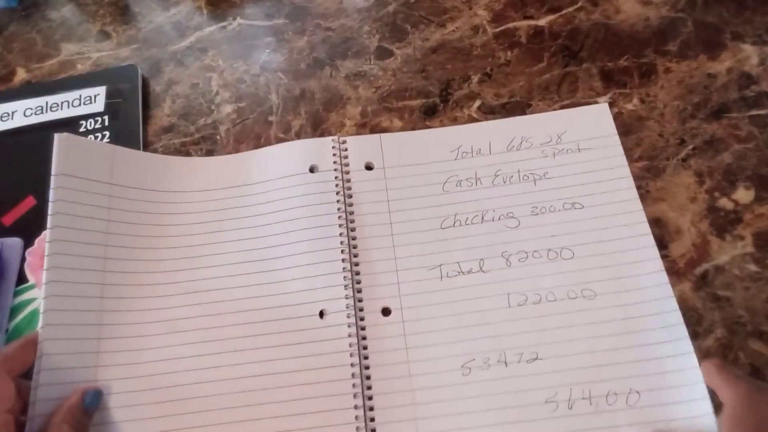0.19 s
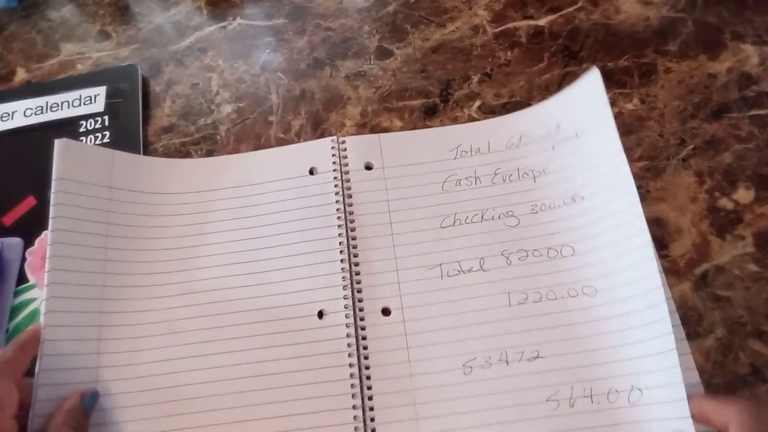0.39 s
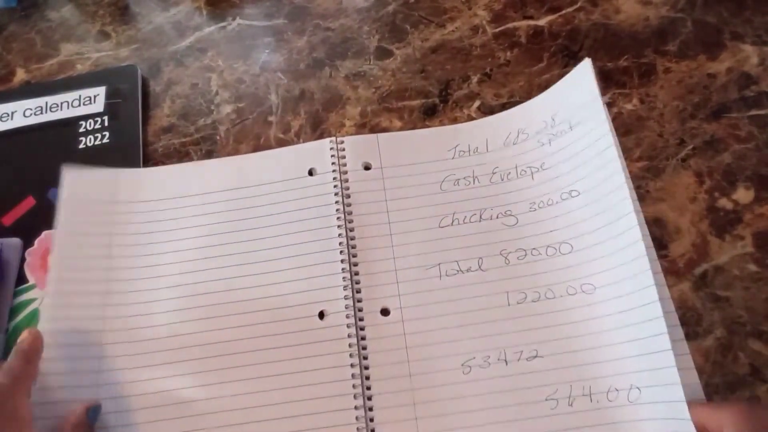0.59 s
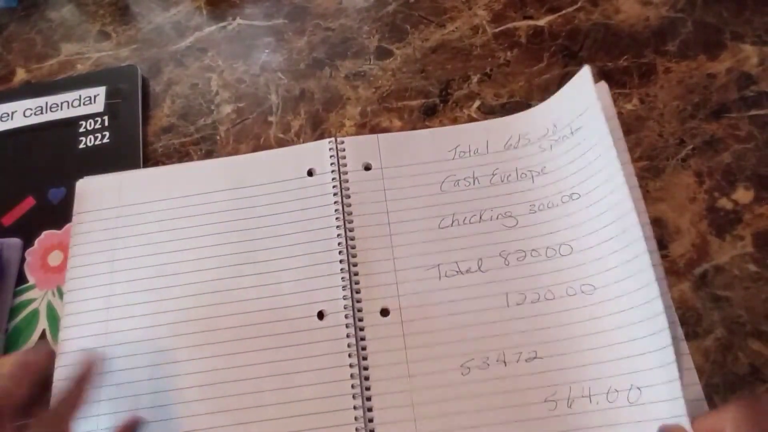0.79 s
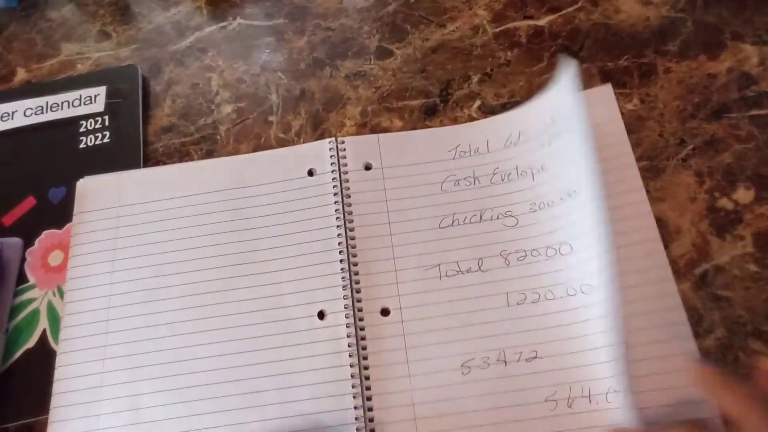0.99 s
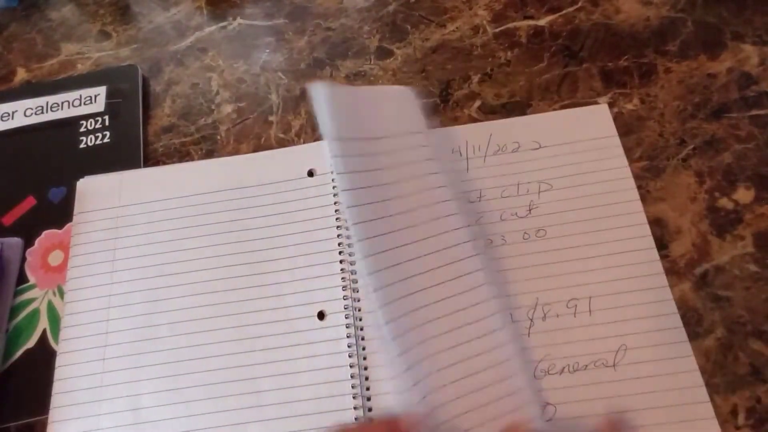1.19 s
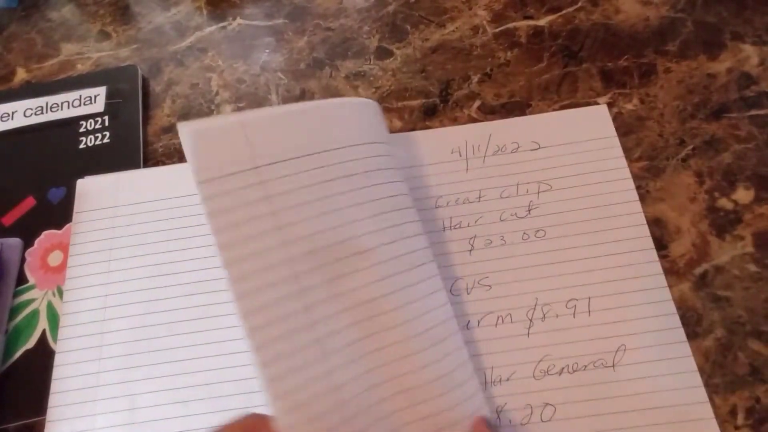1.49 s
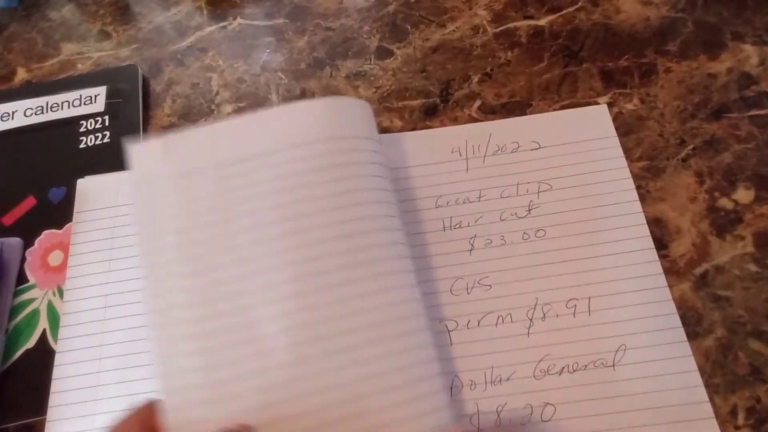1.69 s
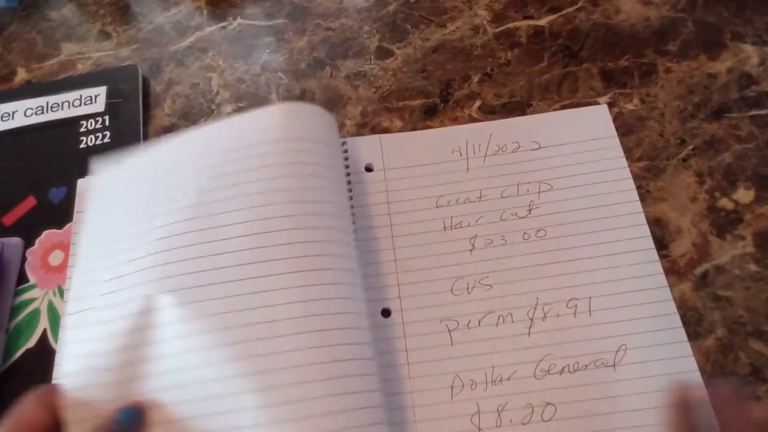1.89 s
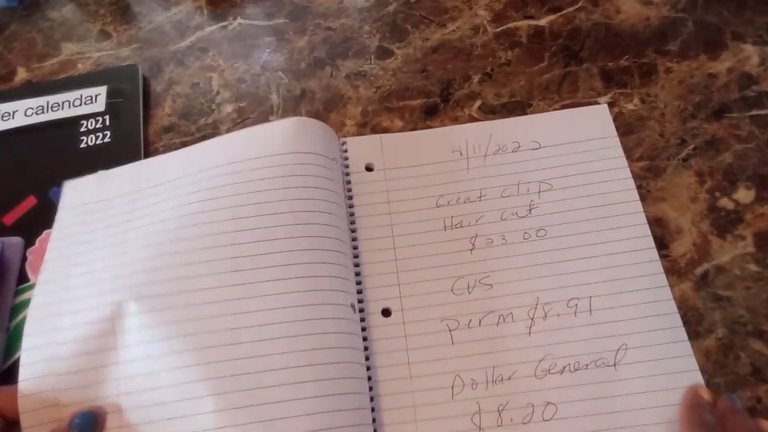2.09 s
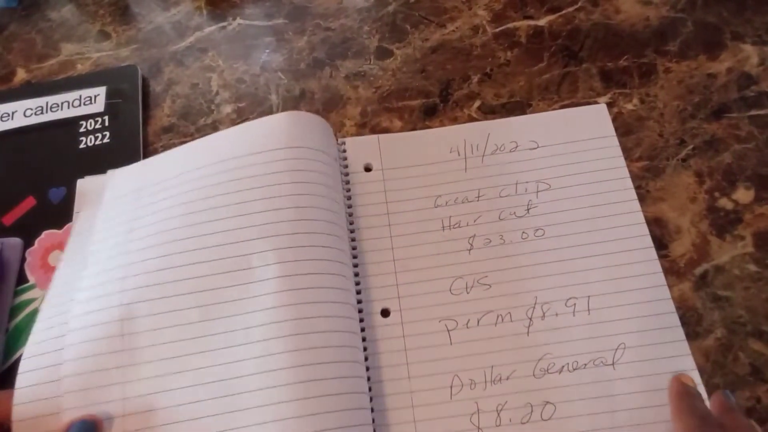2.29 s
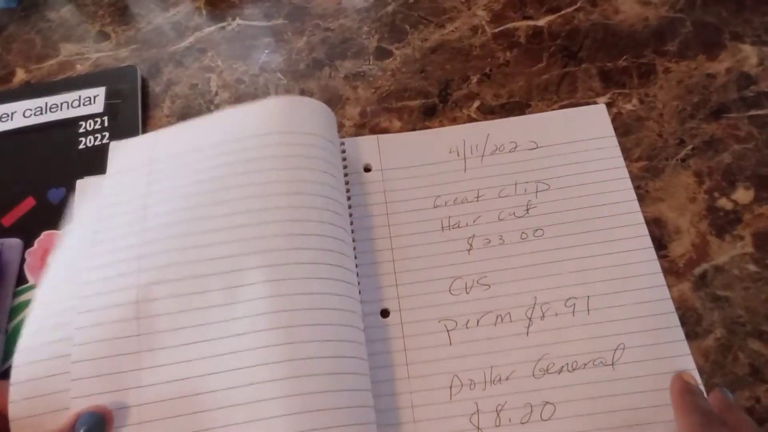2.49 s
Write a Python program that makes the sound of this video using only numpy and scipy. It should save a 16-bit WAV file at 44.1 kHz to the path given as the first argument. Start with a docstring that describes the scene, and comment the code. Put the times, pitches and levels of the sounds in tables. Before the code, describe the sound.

A spiral notebook page turning, close and mono: soft sliding rustles first, then a flurry of crisp crackles and snaps as the sheet flips, then lighter smoothing rubs, in a small room with faint low hum.

```python
"""A page of a spiral notebook is lifted, turned over and smoothed down on a stone counter, in mono.
Sliding paper is coloured noise with many tiny slips; the bending sheet flutters with fewer slips.
Its edge adds a fine bright hiss, rubs softly as it comes free, and the sheet snaps where it buckles.
The small room answers the paper with quick reflections and a short tail, under a faint wavering hum.
"""
import sys
import numpy as np
from scipy import signal
from scipy.fft import rfft, irfft
from scipy.io import wavfile

SR = 44100
rng = np.random.default_rng(int(sys.argv[2]) if len(sys.argv) > 2 else 0)


def store_wav(level_fs):
    """Save 16-bit WAV to argv[1]."""
    pcm = np.round(np.clip(np.atleast_2d(level_fs), -1, 1) * 32767)
    wavfile.write(sys.argv[1], SR, pcm.T.astype(np.int16))


N = 116865
T = np.arange(N) / SR  # time [s]

# Room hum and hiss: (frequency [Hz], relative level [dB per Hz])
HUM_COLOUR = [(20, -37), (45, -33), (75, -25), (100, -5), (150, 0), (200, -4), (260, -1), (340, -8),
              (420, -23), (700, -24.5), (1300, -74), (2000, -74), (3200, -72), (6000, -37), (10000, -77.5),
              (16000, -45)]
# Tones in the hum, before the swell: (frequency [Hz], level [dB], waver width [Hz])
HUM_TONES = [(203.6, -56, 14.4), (161.3, -61, 12.6)]
# Swells and dips of the low hum: (time [s], level [dB])
HUM_SWELL = [(0, 3), (.085, -1.5), (.13, 2), (.24, 5.5), (.3, -5), (.4, 3.5), (.58, -2), (.67, 4.5),
             (.8, -1.5), (.97, -0.5), (1.05, -1.5), (1.3, -2.5), (1.45, 3), (1.6, -6), (1.78, 1.5),
             (1.95, -1), (2.15, -4.5), (2.3, -1.5), (2.41, 3), (2.56, -1), (2.65, 2.5)]
HUM_DB = -58  # before the swell
HUM_TOP_HZ = 450  # only the sound below this swells

# Sheet sliding on sheet and under the fingers, before clumping: (time [s], level [dB])
SLIDE_LEVEL = [(0, -78), (.11, -77), (.21, -63), (.243, -49.5), (.285, -64), (.365, -62.5), (.405, -47),
               (.5, -47.5), (.6, -50.5), (.72, -54), (.775, -46), (.815, -53), (.88, -48.5), (.945, -56.5),
               (1.02, -47.5), (1.08, -59), (1.146, -73), (1.162, -52), (1.19, -54.5), (1.31, -40.5),
               (1.36, -48.5), (1.4, -46), (1.46, -47.5), (1.515, -48.5), (1.565, -42), (1.598, -45),
               (1.625, -44.5), (1.67, -44), (1.71, -53.5), (1.76, -56), (1.81, -57.5), (1.875, -64.5),
               (1.897, -51), (1.915, -54), (1.95, -51.5), (2.04, -49), (2.138, -61.5), (2.165, -48.5),
               (2.24, -47.5), (2.32, -51), (2.38, -52), (2.425, -61), (2.46, -53.5), (2.55, -60.5),
               (2.6, -74.5), (2.65, -78)]
# Colour of the sliding paper: (frequency [Hz], relative level [dB per Hz])
SLIDE_COLOUR = [(40, -33), (300, -13), (500, -37), (800, -14), (1150, 3.5), (1800, 2.5), (2500, 6.5),
                (4200, 6.5), (5800, 3), (7200, -4), (8600, -10.5), (10300, -22), (12500, -13.5),
                (16000, -12)]
SLIDE_GRAINS_PER_S, SLIDE_SPREAD_DB, SLIDE_SMOOTH = 4500, 0.5, 0.64  # smooth: hiss rms beside the slips

# Lifted sheet bending and fluttering, before clumping: (time [s], level [dB])
FLEX_LEVEL = [(0, -73.5), (.21, -79), (.245, -60.5), (.29, -74), (.5, -68.5), (.6, -59), (.7, -66),
              (.82, -79), (.865, -52), (.93, -83), (.98, -66), (1.015, -40), (1.06, -67), (1.15, -78),
              (1.2, -42.5), (1.26, -43), (1.31, -50), (1.34, -37.5), (1.362, -47), (1.43, -42.5),
              (1.5, -60.5), (1.57, -44.5), (1.6, -49.5), (1.63, -42), (1.705, -52.5), (1.738, -45.5),
              (1.76, -36.5), (1.785, -48), (1.835, -52.5), (1.875, -62), (1.945, -45), (2.04, -66),
              (2.14, -61), (2.16, -57), (2.205, -42.5), (2.27, -56.5), (2.38, -57), (2.43, -60),
              (2.48, -54.5), (2.57, -65.5), (2.65, -78)]
# Colour of the bending sheet: (frequency [Hz], relative level [dB per Hz])
FLEX_COLOUR = [(30, -36), (80, -21), (160, 1.5), (330, 4), (450, -1), (700, 5.5), (1000, 3.5), (1500, 0.5),
               (2200, -1.5), (4000, -7.5), (8000, -27), (16000, -42)]
FLEX_GRAINS_PER_S, FLEX_SPREAD_DB, FLEX_SMOOTH = 700, 2.5, 0.63

# Sheet's edge skimming the page below, before clumping: (time [s], level [dB])
SKIM_LEVEL = [(0, -82), (.38, -82), (.41, -64.5), (.58, -77), (.72, -91), (.78, -61), (.93, -68),
              (1.03, -81), (1.1, -88), (1.146, -86), (1.156, -57), (1.2, -49.5), (1.3, -60), (1.38, -76),
              (1.45, -58), (1.51, -59), (1.56, -49), (1.66, -52), (1.72, -63), (1.83, -92), (2.13, -77),
              (2.16, -61), (2.3, -73), (2.42, -92), (2.65, -90)]
# Colour of the skimming edge: (frequency [Hz], relative level [dB per Hz])
SKIM_COLOUR = [(40, -32), (1000, 22), (3500, -10), (6500, 1.5), (8500, 7), (10300, 0.5), (12500, 10),
               (16000, -10.5)]

CLUMP_HZ, CLUMP_DB = 50, 1.48  # slips come in clumps: bandwidth, rms depth
PATCH_DB, PATCH_HZ, PATCH_S = 2, 262.7, 0.047  # shifting resonances: rms depth, width, lifetime

# Page edge rubbing free:
# (time of its height [s], level [dB], centre [Hz], width [Hz], rise [s], fall [s])
RUBS = [(.485, -43.5, 2698, 710, 0.027, 0.051), (0.644, -51, 2242, 460, 0.045, 0.047),
        (1.06, -52.5, 2260, 655, 0.063, 0.023)]
RUB_GLIDE = -2500  # Hz per s: the pitch sinks as the free edge lengthens

# Sheet buckling:
# (time [s], level over 10 ms [dB], centre [Hz], crackle decay [s], level of the sharp edge [dB])
SNAPS = [(.831, -42, 2420, .002, -29), (0.836, -43, 4060, 0.0091, 10), (0.852, -41.5, 4170, 0.002, -16),
         (0.9921, -42.5, 2540, 0.002, -8), (0.997, -34.5, 2110, 0.0036, 4), (1.007, -35, 2050, 0.012, -20),
         (1.02, -41.5, 1970, 0.009, -18), (1.1822, -48, 1400, 0.01, -22), (1.182, -44.5, 6160, 0.015, -14),
         (1.193, -41.5, 6900, 0.018, -20), (1.204, -45, 680, 0.005, -17), (1.249, -38.5, 1020, 0.0021, -15),
         (1.258, -44.5, 790, 0.0065, -29), (1.274, -41.5, 4130, 0.003, -8), (1.297, -42, 1200, 0.0017, -25),
         (1.3255, -36.5, 1460, 0.0063, -12), (1.331, -36, 1700, 0.0024, -18), (1.37, -39, 2560, 0.004, -32),
         (1.388, -40, 616, 0.0023, -32), (1.410, -46.5, 4860, 0.0017, -19),
         (1.422, -28.5, 3440, 0.0015, -6), (1.4286, -41, 900, .003, -16), (1.432, -37, 3520, 0.0093, -8),
         (1.5339, -39, 3100, 0.0014, -9), (1.554, -36, 1120, 0.0025, -17), (1.564, -38.5, 2450, 0.0011, 11),
         (1.6086, -33.5, 3250, 0.0071, 3), (1.613, -39, 1300, 0.0025, -16),
         (1.621, -36.5, 3130, 0.0039, -16), (1.628, -41, 600, .012, -22), (1.6454, -37.5, 2770, .002, -12),
         (1.7184, -40.5, 1047, 0.0014, -16.5), (1.7438, -48, 1390, 0.0049, 2),
         (1.756, -49, 1070, 0.0039, -9), (1.792, -43.5, 900, .002, -31), (1.834, -45.5, 780, 0.0076, -30),
         (1.929, -45, 2420, 0.0037, -19), (1.9329, -37.5, 3460, 0.0021, 0), (1.982, -47, 3400, 0.0035, -6),
         (2.147, -35.5, 3670, 0.003, -9), (2.150, -37, 1300, 0.013, -9), (2.182, -43.5, 2480, 0.0045, -3),
         (2.224, -47, 3260, 0.0042, -20), (2.373, -45.5, 1730, 0.013, -36), (2.381, -49, 2580, 0.0059, -26)]
# Colour of the buckling sheet: (frequency [Hz], relative level [dB per Hz])
SNAP_COLOUR = [(40, -10), (150, -19), (400, 2.5), (1000, 3), (2500, 3), (4300, 3.5), (6000, 2.5),
               (7800, -3.5), (10200, -15), (13000, -9), (16000, -7)]
SNAP_OCTAVES = 0.52  # spread of the broad resonance
SNAP_RING_DB, SNAP_RING_WIDTH = 2, 0.094  # ring at the centre: level, half width as a share of its pitch
SNAP_RIPPLE_DB = 3.5  # each buckle has its own uneven colour
SNAP_CRACKLE = 1.4 / np.sqrt(10)  # crackle beside a pulse of one
SNAP_CLEAN_S = 0.0018  # snaps shorter than this are nearly a single pulse

# Reverberation of the small room: (frequency [Hz], time to fall by 60 dB [s])
ROOM_T60 = [(150, 0.12), (1000, 0.22), (4000, 0.14), (14000, 0.14)]
ROOM_DB, EARLY_DB, EARLY_DECAY_S = -11.5, -14, 0.014
EDGE_HZ = 16150  # top of the recorder's band


def amp(db):
    """Decibels to gain."""
    return 10 ** (np.asarray(db) / 20)


def unit(x):
    """Scales to an rms of one."""
    return x / np.sqrt(np.mean(x ** 2) + 1e-20)


def read(points, hz):
    """Reads a table on a log-frequency axis."""
    f, value = np.transpose(points)
    return np.interp(np.log(hz + 1), np.log(f + 1), value)


def level(points):
    """Gain over time from (time [s], level [dB]) points."""
    s, db = np.transpose(points)
    return amp(np.interp(T, s, db))


def add(mix, s, sound):
    """Adds a sound at a time, cut at the end of the mix."""
    part = mix[max(round(s * SR), 0):][:len(sound)]
    part += sound[:len(part)]


def coloured(x, colour):
    """Gives a steady signal a spectrum and an rms of one."""
    gain = amp(read(colour, np.fft.rfftfreq(N, 1 / SR)))
    return unit(irfft(rfft(x) * gain, N))


def wavering(width_hz):
    """Slow complex noise of rms one and the given bandwidth."""
    noise = rng.standard_normal(N) + 1j * rng.standard_normal(N)
    lowpass = np.exp(-(np.fft.fftfreq(N, 1 / SR) / width_hz) ** 2)
    slow = np.fft.ifft(noise * lowpass)
    return slow / np.sqrt(np.mean(abs(slow) ** 2))


def hum():
    """A low rush with two wavering tones, swelling gently under a steady hiss."""
    out = amp(HUM_DB) * coloured(rng.standard_normal(N), HUM_COLOUR)
    for hz, db, width_hz in HUM_TONES:
        tone = wavering(width_hz) * np.exp(2j * np.pi * hz * T)
        out += amp(db) * unit(tone.real)
    lowpass = signal.butter(4, HUM_TOP_HZ, fs=SR, output="sos")
    low = signal.sosfiltfilt(lowpass, out)
    hiss = out - low
    return low * level(HUM_SWELL) + hiss


def grains(per_s, spread_db, smooth):
    """Tiny slips of uneven size and random sign over an even hiss."""
    size = amp(spread_db * np.minimum(rng.exponential(1, N), 4))
    sign = rng.choice([-1., 1.], N)
    slips = size * sign * (rng.random(N) < per_s / SR)
    return unit(slips) + smooth * rng.standard_normal(N)


def slide():
    """Paper fibres catch and slip as the sheet slides."""
    slips = grains(SLIDE_GRAINS_PER_S, SLIDE_SPREAD_DB, SLIDE_SMOOTH)
    return level(SLIDE_LEVEL) * coloured(slips, SLIDE_COLOUR)


def flex():
    """Larger, sparser folds give the bending sheet its hollow flutter."""
    folds = grains(FLEX_GRAINS_PER_S, FLEX_SPREAD_DB, FLEX_SMOOTH)
    return level(FLEX_LEVEL) * coloured(folds, FLEX_COLOUR)


def skim():
    """A fine bright hiss from the sheet's edge skimming the page below."""
    return level(SKIM_LEVEL) * coloured(rng.standard_normal(N), SKIM_COLOUR)


def patches(shape, rows, columns):
    """A smooth random field of rms one, with patches of the given size in cells."""
    a = np.fft.fftfreq(shape[0])[:, None] * rows
    b = np.fft.fftfreq(shape[1]) * columns
    smoothing = np.exp(-2 * (a ** 2 + b ** 2))
    return unit(np.fft.ifft2(np.fft.fft2(rng.standard_normal(shape)) * smoothing).real)


def rustle(size=512):
    """Sliding, bending and skimming come in clumps and ring the sheet's shifting resonances."""
    clumps = amp(CLUMP_DB * unit(wavering(CLUMP_HZ).real))
    paper = (slide() + flex() + skim()) * clumps
    overlap = 3 * size // 4
    hz, s, spectrum = signal.stft(paper, SR, nperseg=size, noverlap=overlap)
    field = patches(spectrum.shape, PATCH_HZ / hz[1], PATCH_S / s[1])
    resonances = unit(amp(PATCH_DB * field))
    return signal.istft(spectrum * resonances, SR, nperseg=size, noverlap=overlap)[1][:N]


def rub(s, db, hz, width_hz, rise_s, fall_s):
    """A soft hissing resonance swells, fades and sinks in pitch as the page edge comes free."""
    t = T - s
    swell = 1 / np.cosh(np.clip(t / np.where(t < 0, rise_s, fall_s), -20, 20))
    turn = np.exp(2j * np.pi * np.cumsum(hz + RUB_GLIDE * t) / SR)
    return amp(db) * swell * unit((wavering(width_hz) * turn).real)


def snap(db, centre_hz, decay_s, edge_db, size=8192):
    """One buckle: a sharp pulse and a dying crackle ring a broad, uneven resonance of the sheet."""
    t, hz = np.arange(size) / SR, abs(np.fft.fftfreq(size, 1 / SR))
    crackle = rng.standard_normal(size) * np.exp(-t / decay_s)
    pulse = t == 0
    drive = crackle * SNAP_CRACKLE * np.tanh((decay_s / SNAP_CLEAN_S) ** 2) + pulse

    bump = np.exp(-.5 * (np.log2((hz + 1) / centre_hz) / SNAP_OCTAVES) ** 2)
    detuning = hz / centre_hz - centre_hz / (hz + 1)
    ring = amp(SNAP_RING_DB) / np.hypot(1, detuning / (2 * SNAP_RING_WIDTH))
    ripple = np.interp(hz / PATCH_HZ, np.arange(size), rng.standard_normal(size))
    gain = amp(read(SNAP_COLOUR, hz) + SNAP_RIPPLE_DB * ripple) * (bump + ring + amp(edge_db))

    # Minimum phase: the resonance answers at once, with nothing ahead of the pulse
    response = np.exp(np.conj(signal.hilbert(np.log(gain))))
    sound = np.fft.ifft(np.fft.fft(drive) * response).real
    return amp(db) * sound / np.linalg.norm(sound) * np.sqrt(SR / 100)  # energy as rms over 10 ms


def snaps():
    """All the buckles of the turning page."""
    out = np.zeros(N)
    for s, *row in SNAPS:
        add(out, s, snap(*row))
    return out


def room(x, size=16384):
    """Quick reflections off counter and walls, then a short diffuse tail."""
    t = np.arange(size) / SR
    taps = rng.standard_normal(size) * (rng.random(size) < .06) * (t > .0015)
    early = taps * np.exp(-t / EARLY_DECAY_S)
    # The tail dies at its own rate in each frequency band
    hz, s, spectrum = signal.stft(rng.standard_normal(size) * (t > .007), SR, nperseg=256)
    decay = amp(-60 * s / read(ROOM_T60, hz)[:, None])
    tail = signal.istft(spectrum * decay, SR, nperseg=256)[1][:size]
    echo = amp(EARLY_DB) * early / np.linalg.norm(early) + amp(ROOM_DB) * tail / np.linalg.norm(tail)
    return x + signal.fftconvolve(x, echo)[:N]


def scene():
    """The turning page in the humming room, on one channel; the hum gets no added echo."""
    rubs = sum(rub(*row) for row in RUBS)
    page = rustle() + rubs + snaps()
    return (hum() + room(page))[None]


def record(dry):
    """The recorder's band limit, a steep low-pass."""
    lowpass = signal.firwin(511, EDGE_HZ, window=("kaiser", 9), fs=SR)
    return signal.oaconvolve(dry, lowpass[None], "same")


dry = scene()
out = record(dry)
store_wav(out)
```